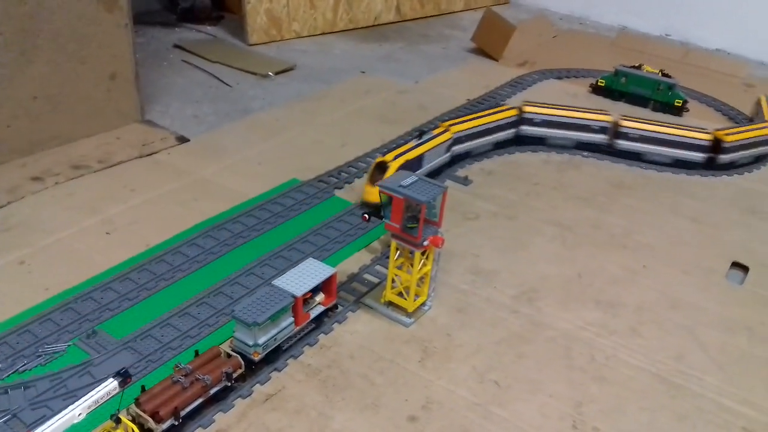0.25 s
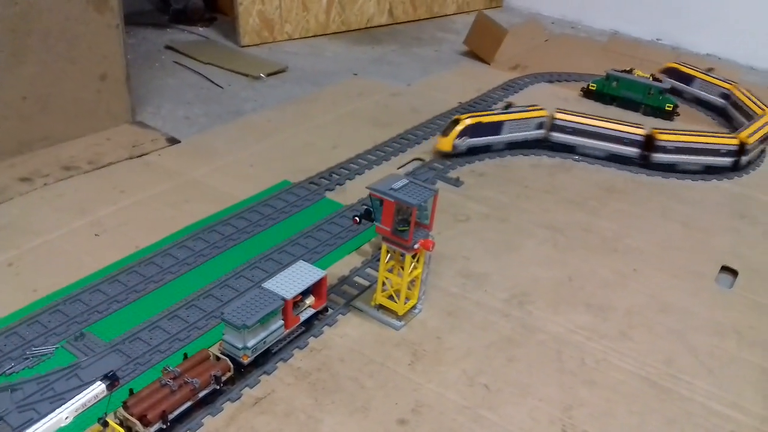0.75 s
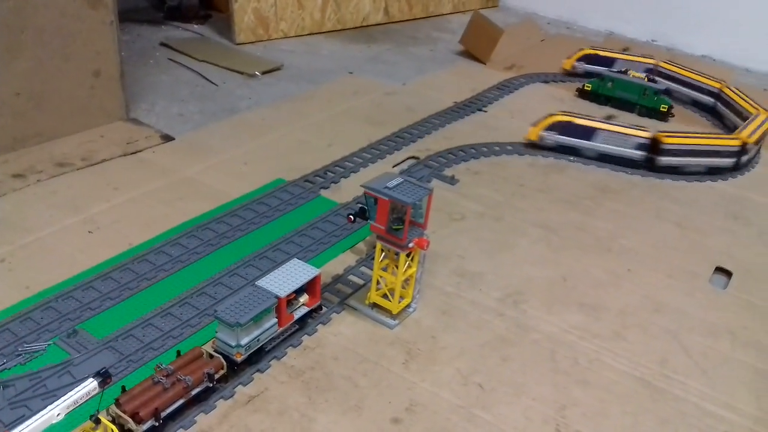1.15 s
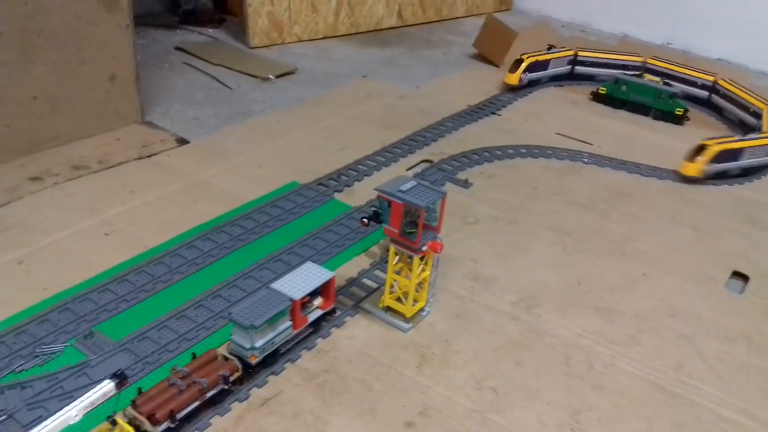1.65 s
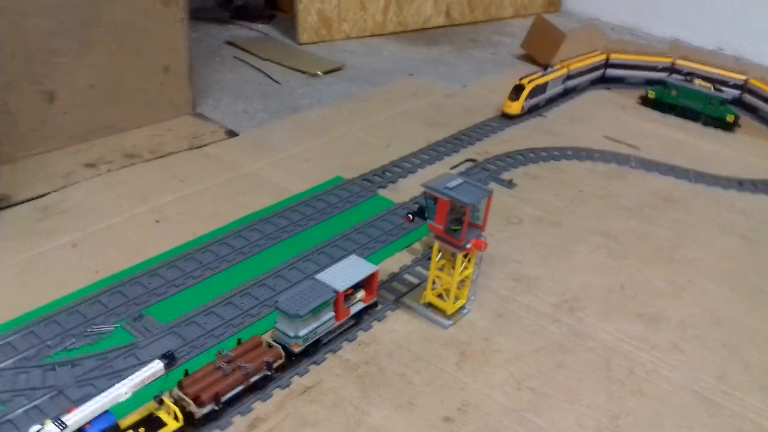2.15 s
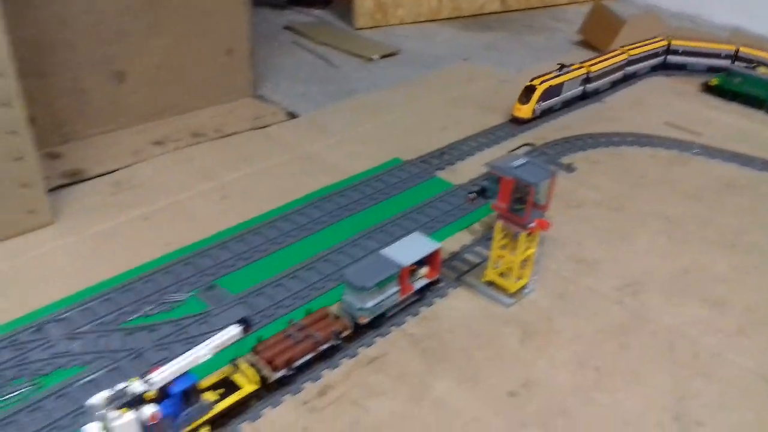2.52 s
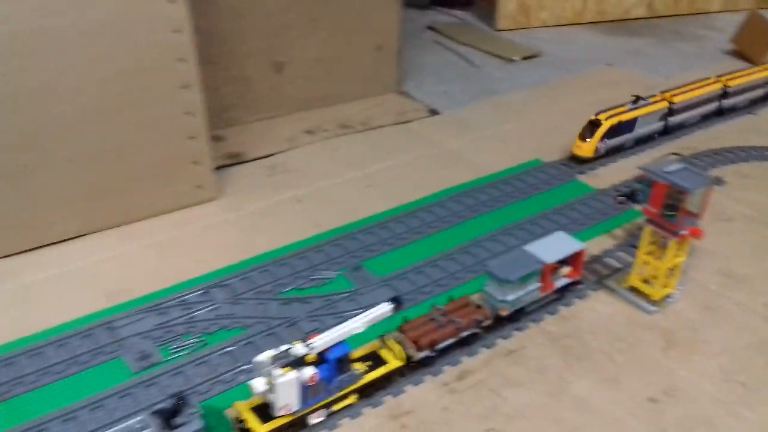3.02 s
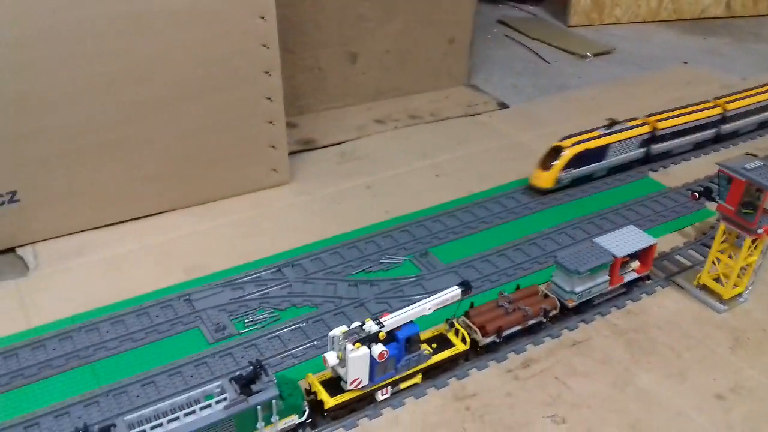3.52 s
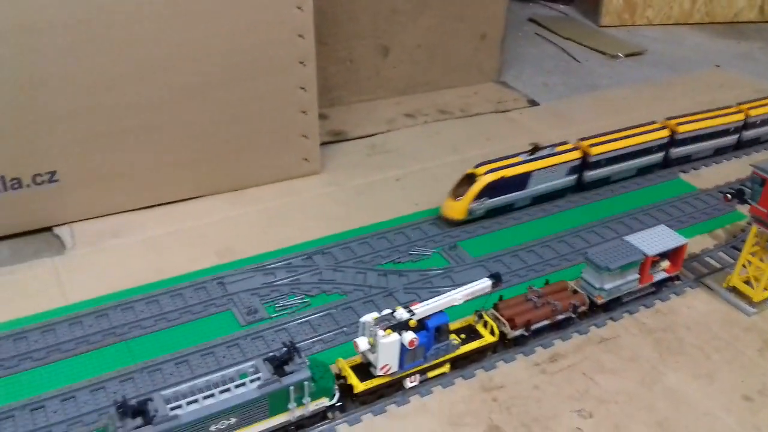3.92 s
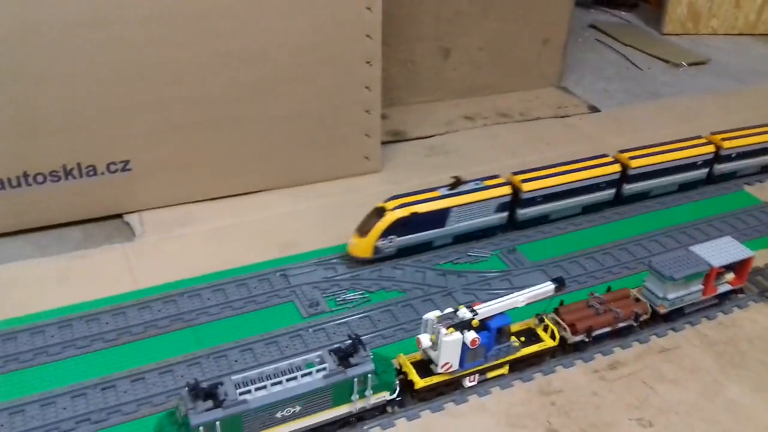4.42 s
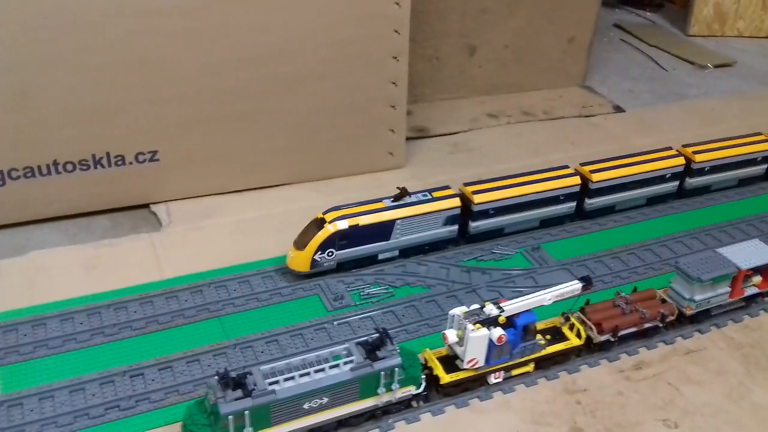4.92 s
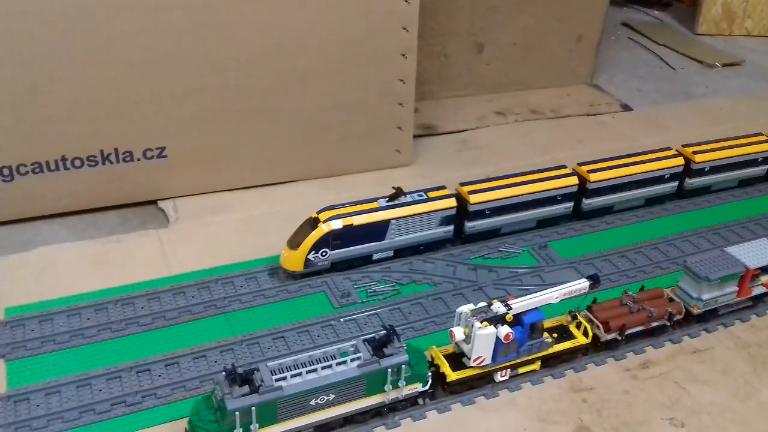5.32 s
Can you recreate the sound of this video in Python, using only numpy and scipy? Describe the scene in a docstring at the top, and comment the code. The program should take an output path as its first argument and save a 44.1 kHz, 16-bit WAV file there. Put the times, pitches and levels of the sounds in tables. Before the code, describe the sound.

A small battery toy train is already running on plastic track, heard from nearby in a bare room with a short echo. For the first two seconds its gears and wheels make a dense, grinding rattle round a bend, with small surges and sharp plastic clicks at rail joints. At about 2.1 seconds a finger gives the microphone one soft, low bump. The rattle then becomes a little quieter and brighter, chattering along the straight with occasional knocks. From about 3.8 to 4.5 seconds the wheels cross the points in a quick, louder flurry of hollow plastic clacks. After that the train coasts and the rattle falls away quickly, almost gone by 5 seconds. A few faint ticks follow as it stops at around 5.4 seconds. Very faint room rumble, electrical hum and microphone hiss lie underneath.

```python
"""In a bare room, a battery toy train rattles round a bend of plastic track, comes up the straight
over the points and coasts to a stop. Dense impacts of gear teeth and wheels excite the resonances
of the hollow cars and rails, and rail joints add single knocks. The walls reverberate over mains
hum and microphone hiss; a finger bumps the microphone's housing once."""
import sys
import numpy as np
from scipy import signal
from scipy.fft import rfft, irfft
from scipy.io import wavfile
from scipy.ndimage import uniform_filter1d

SR = 44100
rng = np.random.default_rng(int(sys.argv[2]) if len(sys.argv) > 2 else 0)


def transcribe(u):
    """Save the signal u as a 16-bit wav file named by the first command-line argument.

    u: samples, shape (n,) or (channels, n), limited to [-1, 1]; the rate is SR.
    q: integer samples, one column per channel.
    """
    v = np.clip(np.atleast_2d(u).T, -1, 1)
    q = np.round(v * 32767).astype(np.int16)
    wavfile.write(sys.argv[1], SR, q)


N = 245195

# Course of the rattle: (time [s], gain [dB], floor rumble lift [dB], wheel hiss lift [dB])
RATTLE_ENVELOPE = [(0, -29.5, -0.5, -2.5), (.15, -33, 0.5, -0.5), (.6, -34, 0, 0.5), (1.0, -36, 3.5, 0.5),
                   (1.3, -32.5, -1.5, -2), (1.9, -34, -5.5, -1), (2.2, -36, -3, -3.5),
                   (2.4, -37.5, -2.5, 2), (2.7, -39.5, 1.5, 2), (3.2, -39.5, 0.5, 3), (3.8, -39.5, 3.5, 5),
                   (4.2, -37, 1, 1), (4.48, -36, -1, 0), (4.6, -41.5, 2, -2), (4.85, -49, 5, -2),
                   (5.17, -63.5, 9, 4.5), (5.33, -69, 11.5, 5)]
# Brief swings of the clatter as wheels run onto a joint or the points: (time [s], step size [dB])
JOINT_SURGES = [(.18, 3.5), (.33, 2), (.69, 3), (.88, 3.5), (1.05, 4), (1.96, 2.5), (2.62, 2.5), (3.05, 2),
                (3.3, 4.5), (3.51, 2.5), (3.72, 5), (3.87, 5.5), (4.06, 5), (4.22, -1), (4.34, 1.5)]
# Flanges grinding round the bend: (frequency [Hz], relative spectral density [dB])
BEND_SPECTRUM = [(59, -60), (100, -30.5), (128, -27), (309, -10.5), (443, -12), (555, -5.5), (609, -7.5),
                 (958, -2), (1180, 0), (1620, -4), (2410, -2), (3050, -3.5), (3510, -8), (4080, -8),
                 (5020, -15), (6180, -32.5), (9000, -52.5), (11700, -82.5), (19800, -120)]
# Wheels on the straight: (frequency [Hz], relative spectral density [dB])
STRAIGHT_SPECTRUM = [(35, -70.5), (60, -42), (195, -13.5), (264, -14.5), (418, -11.5), (660, -3.5),
                     (804, -6.5), (999, -2.5), (1760, -0.5), (2780, -8), (3300, -8), (3750, -4.5),
                     (4300, -11), (4910, -18.5), (7270, -38), (11000, -51.5), (14300, -81.5), (22000, -120)]
# Wheels striking rail joints, before filtering: (time [s], ring peak [dB], crack peak [dB])
JOINT_KNOCKS = [(0.0229, -28, -40), (0.0504, -23, -28), (0.2065, -27, -31), (.4379, -30, -33),
                (.9224, -32, -37), (1.0724, -28, -33), (1.7863, -30, -38), (2.6324, -31, -34),
                (3.3538, -33, -34), (3.5094, -30, -36), (3.7289, -30, -33), (3.8696, -23, -37),
                (3.882, -27, -19), (3.9065, -22, -37), (3.9315, -25, -35), (3.9434, -28, -33),
                (4.0194, -32, -35), (4.0642, -24, -38), (4.0706, -25, -33), (4.1056, -24, -37),
                (4.2253, -26, -38), (4.2687, -26, -40), (4.2834, -26, -39), (4.3126, -27, -39),
                (4.344, -22, -38.5), (4.354, -26, -18), (4.3879, -24, -35), (4.4534, -28, -39),
                (4.6374, -31, -43), (4.6694, -36, -41), (4.7137, -33, -47), (4.7436, -37, -42),
                (4.8339, -42, -52), (5.02, -47, -53), (5.2103, -54, -60), (5.2365, -53, -58),
                (5.3053, -56, -64), (5.3811, -49, -55)]
# Modes of a hollow car: (frequency [Hz], relative level [dB], 60 dB decay time [s])
BODY_MODES = [(1130, -12, 0.0098), (1727, -1.5, .018), (2000, -3, 0.0165), (2436, -8, 0.018),
              (3000, -12, 0.015), (3570, -10, .014)]
# Room rumble and microphone hiss: (frequency [Hz], relative spectral density [dB])
NOISE_SPECTRUM = [(25, -16), (60, -9.5), (100, -3), (160, -7), (350, -2), (700, -4.5), (1800, -18.5),
                  (4000, -29), (6900, -22.5), (10000, -23), (15500, -22.5)]
# Stereo width of that noise: (frequency [Hz], side minus mid [dB])
NOISE_WIDTH = [(40, -5.5), (300, -6), (2000, -39), (6000, 5), (12000, -2.5)]
# Hum tones as lowered by the suppressor: (frequency [Hz], level [dB])
HUM_TONES = [(101, -83), (340, -80)]

TICKS_PER_S, ROLL_DB = 3000, -3  # rolling noise relative to the ticks
RUMBLE_BELOW_HZ, HISS_ABOVE_HZ = 600, 3020
SURGE_RISE_S, SURGE_FALL_S, SURGE_HISS_SHARE = .0071, .08, .51
FRONT_LEAVES_S, FRONT_OUT_S, TAIL_OUT_S = 2.1, 2.3, 4.1  # the cars swing out of the bend
BEND_SHARE, TAIL_SHARE = .9, .43  # share of power made in the bend: at first, then by the tail alone
POINTS_S, POINTS_TAPS = (3.86, 4.5), 45
TAP_DB, TAP_SCATTER_DB, TAP_CRACK_DB = -32, 2, -18  # crack relative to ring
CRACK_HZ, CRACK_T60_S = (2500, 4800), .012
MODE_SPREAD, MODE_SCATTER_DB, CONTACT_S = .045, 3, .0005
BOUNCES, BOUNCE_GAP_S, BOUNCE_DB = 3, .004, -6
SLOW_FROM_S, SLOW_BOUNCE_DB = 5.1, -1.5
PLASTIC_CUT_HZ, MIC_PORT_HZ = 600, 5640  # thin plastic trims the knocks' bass, the port their treble
ROOM_T60_S, ROOM_DB = .55, -9
BUMP_S, THUMP_DB, THUMP_HZ, THUMP_T60_S, RUSTLE_DB = 2.136, -39, 170, .04, -70.5
DUCK_DB, DUCK_BELOW_DB, DUCK_WINDOW_S = 5.5, -58, .13
DUCKED_NOISE_DB, TOP_HZ, DC_OFFSET = -71, 15750, -.0006


def train_rattle():
    """Forced vibration: a dense rattle of gears and wheels, each band fluctuating on its own."""
    t = np.arange(N) / SR
    times, *columns = np.transpose(RATTLE_ENVELOPE)
    gain_db, rumble_db, hiss_db = (np.interp(t, times, column) for column in columns)
    onsets, steps_db = np.transpose(JOINT_SURGES)
    since = np.maximum(t - onsets[:, None], 0)
    surge_db = steps_db @ (np.minimum(since / SURGE_RISE_S, 1) * np.exp(-since / SURGE_FALL_S))
    bend_share = np.interp(t, [FRONT_LEAVES_S, FRONT_OUT_S, TAIL_OUT_S], [BEND_SHARE, TAIL_SHARE, 0])
    spectra = rfft(rattle_source(bend_share)), rfft(rattle_source(bend_share))
    octave = np.log2(np.fft.rfftfreq(N, 1 / SR) + 1)
    rattle = 0
    for k, centre in enumerate(np.arange(5, 15, .5)):  # neighbouring bands use independent rattles
        band_gain = np.sqrt(np.clip(1 - 2 * abs(octave - centre), 0, 1))
        band = irfft(spectra[k % 2] * band_gain, N)
        low = 1 / (1 + (2 ** centre / RUMBLE_BELOW_HZ) ** 4)
        high = 1 / (1 + (HISS_ABOVE_HZ / 2 ** centre) ** 4)
        surge_share = 1 - low - (1 - SURGE_HISS_SHARE) * high  # the floor rumbles evenly
        lift_db = low * rumble_db + high * hiss_db + surge_share * surge_db
        rattle += band * undb(lift_db + 1.34 * wander(rate_hz=9))
    return rattle * undb(gain_db)


def rattle_source(bend_share):
    """Incoherent sources add in power: even grinding in the bend, rougher chatter on the straight."""
    grind = level(colour(ticks(scatter_db=2), BEND_SPECTRUM), 0)
    chatter = level(colour(ticks(scatter_db=3), STRAIGHT_SPECTRUM), 0)
    return np.sqrt(bend_share) * grind + np.sqrt(1 - bend_share) * chatter


def ticks(scatter_db):
    """Shot noise: gear teeth and treads strike at random, a few hard, over smooth rolling noise."""
    chance, size, sign = rng.random((3, N))
    strength = undb(-scatter_db * np.log(1 - .995 * size))
    hits = (chance < TICKS_PER_S / SR) * strength * np.sign(sign - .5)
    return level(hits * undb(1.07 * wander(rate_hz=18)), 0) + level(rng.standard_normal(N), ROLL_DB)


def wheel_knocks():
    """Inelastic impact: a wheel cracks on a joint or the points, then rings the car at each bounce."""
    knocks = np.zeros(N)
    t = np.arange(SR // 20) / SR
    when, size = rng.random((POINTS_TAPS, 2)).T
    tap_db = TAP_DB + TAP_SCATTER_DB * (2 * size - 1)
    taps = zip(np.interp(when, [0, 1], POINTS_S), tap_db, tap_db + TAP_CRACK_DB)
    for start, ring_db, crack_db in [*JOINT_KNOCKS, *taps]:
        crack = bandpass(rng.standard_normal(len(t)), CRACK_HZ) * undb(-60 * t / CRACK_T60_S)
        knocks[int(start * SR):][:len(t)] += undb(crack_db) * crack / abs(crack).max()
        # a slow wheel shivers over the joint: its bounces fade less
        bounce_db = SLOW_BOUNCE_DB if start > SLOW_FROM_S else BOUNCE_DB
        for k in range(BOUNCES + 1):
            knocks[int(start * SR):][:len(t)] += undb(ring_db + k * bounce_db) * body_ring(t)
            start += BOUNCE_GAP_S * (.5 + rng.random())
    return bandpass(knocks, [PLASTIC_CUT_HZ, MIC_PORT_HZ])


def body_ring(t):
    """Free vibration: a car's damped modes build up while the wheel presses, then die away."""
    hz, mode_db, t60 = np.transpose(BODY_MODES)[:, :, None]
    detune, scatter = rng.standard_normal((2, len(hz), 1))
    modes = np.sin(2 * np.pi * hz * (1 + MODE_SPREAD * detune) * t)
    decay = undb(mode_db + MODE_SCATTER_DB * scatter - 60 * t / t60)
    body = np.sum(modes * decay, axis=0) * (1 - np.exp(-t / CONTACT_S))
    return body / abs(body).max()


def room(direct):
    """Diffuse reverberation: wall echoes decay exponentially, their pattern changing as the train moves."""
    hop = SR // 10
    t = np.arange(SR // 2) / SR
    decay = undb(-60 * t / ROOM_T60_S) * (t > .004)  # first reflection after 4 ms
    padded, wet = np.pad(direct, (hop, 2 * hop)), np.zeros(N + SR)
    for i in range(0, N + hop, hop):
        grain = padded[i:i + 2 * hop] * np.hanning(2 * hop)
        echo = signal.fftconvolve(grain, decay * rng.standard_normal(len(t)))
        wet[i:i + len(echo)] += echo[:len(wet) - i]
    return direct + undb(ROOM_DB) * wet[hop:hop + N] / np.sqrt(np.sum(decay ** 2))


def finger_bump():
    """Structure-borne sound: a shifting finger thumps the microphone's housing, then faintly rustles."""
    t = np.arange(N) / SR - BUMP_S
    since = np.maximum(t, 0)
    thump = np.sin(2 * np.pi * THUMP_HZ * since) * undb(THUMP_DB - 60 * since / THUMP_T60_S)
    rustle = level(bandpass(rng.standard_normal(N), [12500, 15000], order=2), RUSTLE_DB)
    return thump + rustle * np.exp(-((t - .015) / .012) ** 2)


def noise_floor():
    """Superposition: room rumble, wavering mains hum and microphone hiss, widest in the treble."""
    mid, side = (level(colour(rng.standard_normal(N), NOISE_SPECTRUM), DUCKED_NOISE_DB) for _ in range(2))
    t = np.arange(N) / SR
    hum = sum(undb(db + 3.2 * wander(rate_hz=10)) * np.sin(2 * np.pi * hz * t) for hz, db in HUM_TONES)
    return undb(DUCK_DB) * (mid + hum + colour(side, NOISE_WIDTH) * np.array([[1], [-1]]))


def undb(db):
    """Decibels as an amplitude ratio."""
    return 10 ** (np.asarray(db) / 20)


def level(x, db):
    """Scaling to an RMS level."""
    return x * undb(db) / np.sqrt(np.mean(x ** 2))


def bandpass(x, edges_hz, order=4):
    """Maximally flat band-pass filter."""
    return signal.sosfilt(signal.butter(order, edges_hz, "band", fs=SR, output="sos"), x)


def colour(x, spectrum):
    """Minimum-phase filter, from the folded cepstrum of the log gain."""
    hz, db = np.transpose(spectrum)
    size = 4096
    gain_db = np.interp(np.log(np.fft.rfftfreq(size, 1 / SR) + 1), np.log(hz), db)
    cepstrum = irfft(np.log(undb(gain_db)))
    cepstrum[1:size // 2] *= 2
    cepstrum[size // 2 + 1:] = 0
    return signal.fftconvolve(x, irfft(np.exp(rfft(cepstrum))))[:N]


def wander(rate_hz):
    """Random steps smoothed twice; spread near 1."""
    hold = int(SR / rate_hz)
    steps = np.repeat(rng.standard_normal(N // hold + 1), hold)
    return 1.15 * uniform_filter1d(uniform_filter1d(steps, hold), hold)[:N]


def scene():
    """Closely spaced microphone ports hear the train alike, but for a trace of late echo."""
    toy = room(train_rattle() + wheel_knocks())
    side_echo = undb(-49) * np.roll(toy, SR // 20) * np.array([[1], [-1]])
    return toy + side_echo + finger_bump() + noise_floor()


def record(dry):
    """Downward expansion: a noise suppressor lowers quiet sound; a low-pass and a small offset follow."""
    power = uniform_filter1d(np.mean(dry ** 2, axis=0), size=int(DUCK_WINDOW_S * SR))
    level_db = 10 * np.log10(power + 1e-12)
    gain_db = -DUCK_DB / (1 + np.exp((level_db - DUCK_BELOW_DB) / 3))
    lowpass = signal.ellip(10, .2, 70, TOP_HZ, fs=SR, output="sos")
    return signal.sosfilt(lowpass, dry * undb(gain_db)) + DC_OFFSET


dry = scene()
out = record(dry)
transcribe(out)
```